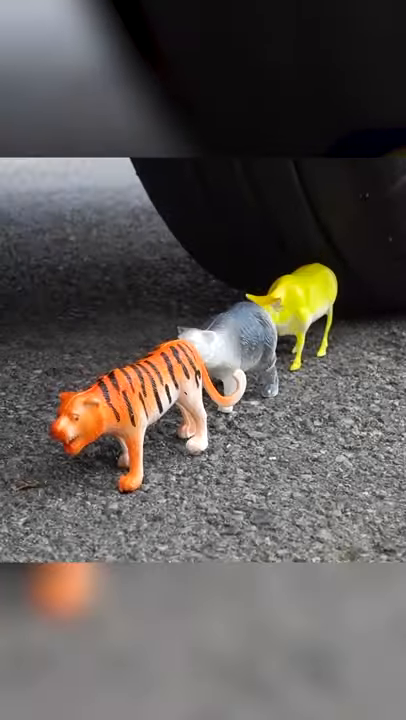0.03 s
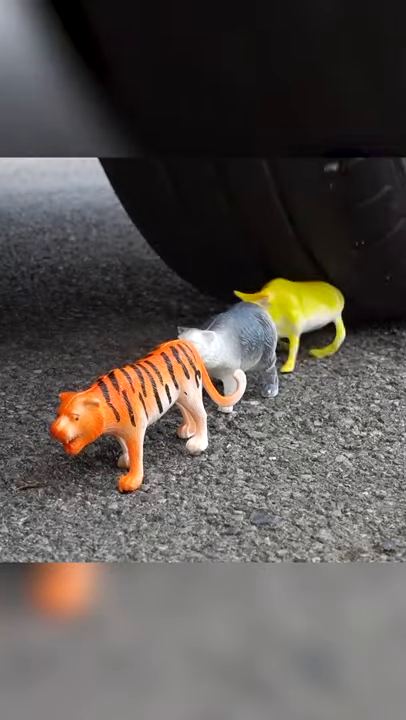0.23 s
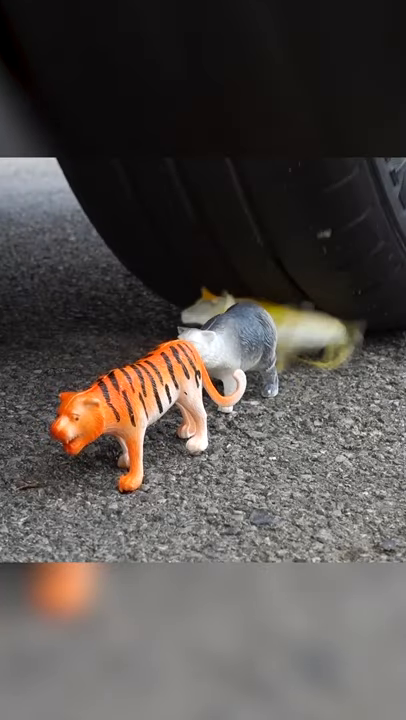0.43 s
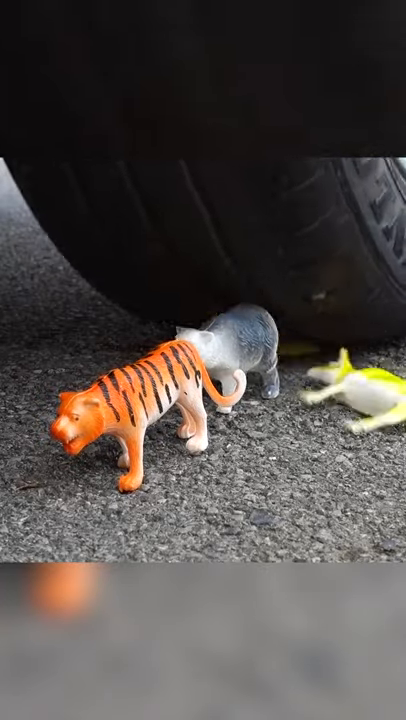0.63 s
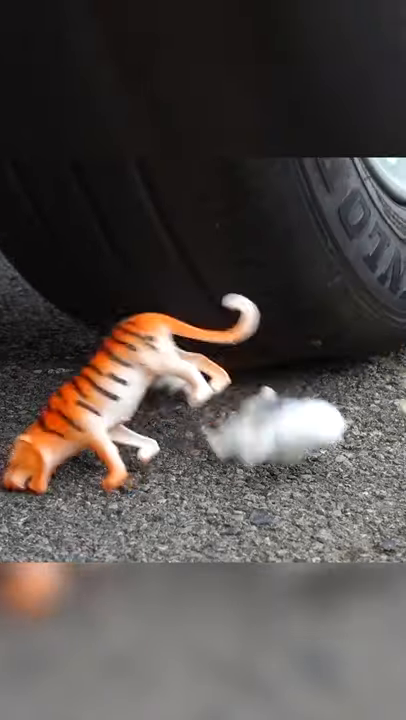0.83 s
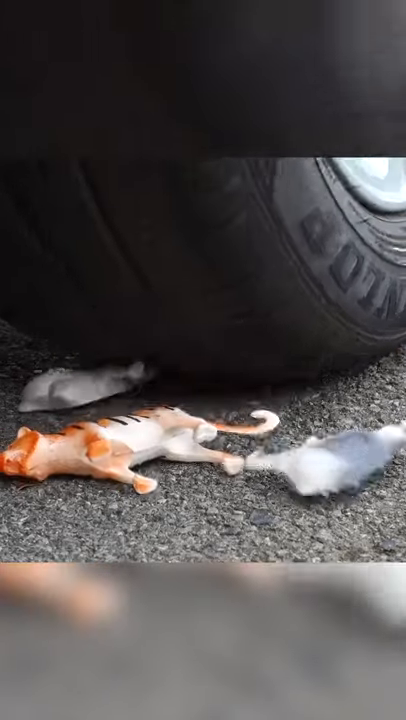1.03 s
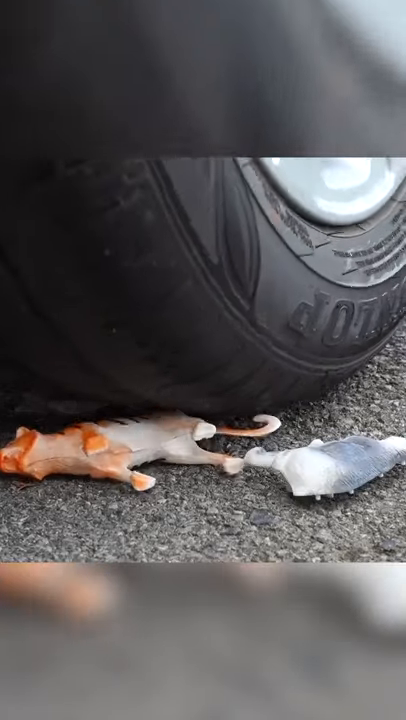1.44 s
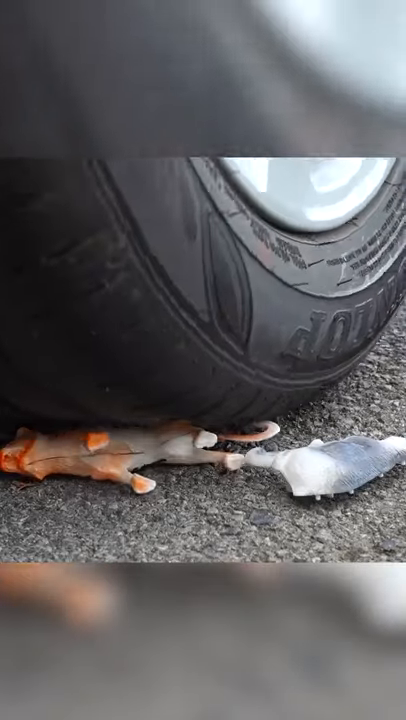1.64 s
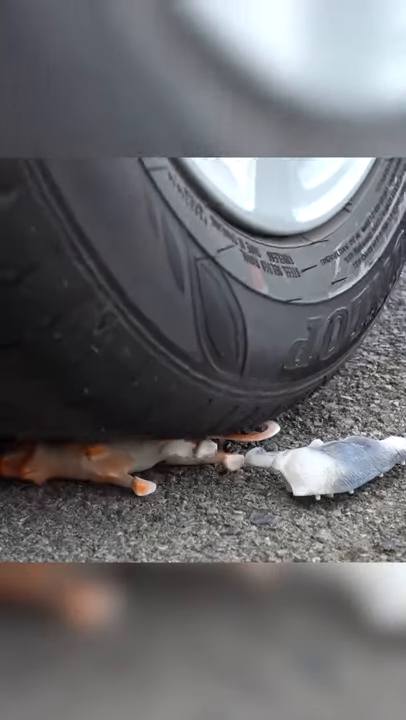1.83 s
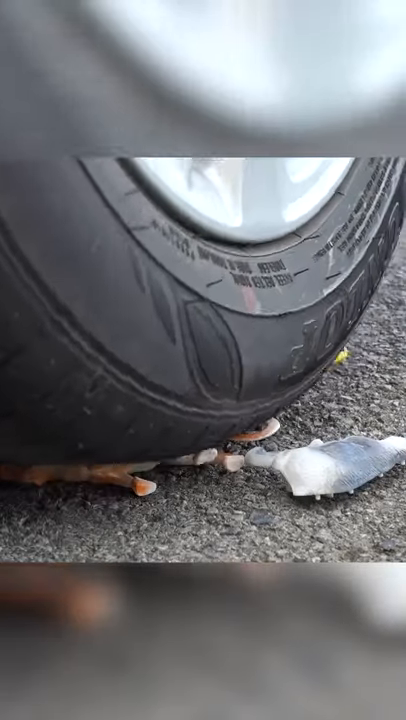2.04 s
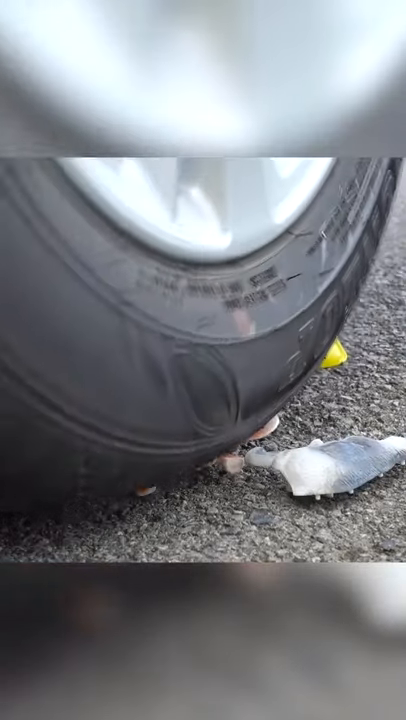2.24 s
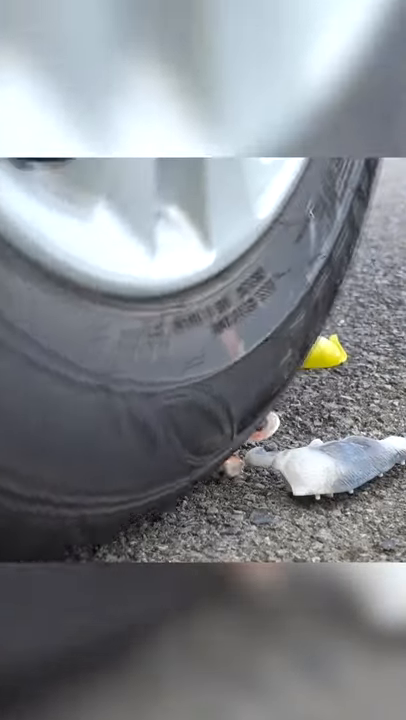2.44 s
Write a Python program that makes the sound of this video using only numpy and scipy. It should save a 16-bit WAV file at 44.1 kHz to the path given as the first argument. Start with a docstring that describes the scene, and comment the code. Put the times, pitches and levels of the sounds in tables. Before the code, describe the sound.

Hollow plastic toys crack under a slowly rolling car tyre, close up on asphalt. Sharp snaps start at about 0.2 seconds and thicken into a crunch around 0.5, with low thumps and crackling grit. The loudest burst comes near 0.8 seconds, then thins to small ticks. More sharp cracks land at 2.0 and around 2.2 seconds. Faint tread hiss and a quietly idling engine continue underneath.

```python
"""A car tyre rolls slowly over hollow plastic toy animals on asphalt, close to the microphone.
The shells give way almost straight ahead, in runs of sharp cracks, each with a brief ring and a low
thump; splinters and grit crackle between them. Behind them the tread hisses and the engine idles
quietly. Sound bounces back from under the car and, faintly, from the open yard.
At this distance the loudest cracks overload the recorder."""
import sys
import numpy as np
from scipy import signal
from scipy.fft import rfft, irfft
from scipy.io import wavfile

SR = 44100
rng = np.random.default_rng(int(sys.argv[2]) if len(sys.argv) > 2 else 0)


def unload_wav(signal):
    """Save mono or channel-first audio to the path in sys.argv[1] as 16-bit WAV at rate SR, clipped to [-1, 1]."""
    wavfile.write(
        sys.argv[1],
        SR,
        np.round(np.clip(np.atleast_2d(signal).T, -1, 1) * 32767).astype(np.int16),
    )


N = 110250
TIMES, FREQS = np.arange(N) / SR, np.arange(N // 2 + 1) * SR / N
SIDE = np.array([[1], [-1]])   # adds on the left, subtracts on the right

# Engine and outdoor noise, spectrum: f/Hz, relative level/dB
AIR_COLOUR = [(15, -6), (25, -5), (49, -6), (70, -22), (153, -5), (185, -9.5), (229, -7.5), (335, -25.5),
              (591, -9.5), (1040, -24), (1890, -25.5), (9840, -33.5), (16000, -54.5)]
# Stereo width of the background at the microphone: f/Hz, side over mid
BACKGROUND_WIDTH = [(40, 0.82), (100, 0.43), (160, 0.68), (300, 0.4), (600, 0.16), (2000, 0.2),
                    (12000, 0.24)]
# Hum of the idling engine: f/Hz, relative level/dB
IDLE_TONES = [(40.5, -44), (102.3, -56), (161.5, -49), (220.7, -54.5), (602.9, -52), (705.2, -64)]
# Hiss of the tread on asphalt: t/s, level/dB
HISS_LEVEL = [(0, -46), (.2, -46), (.7, -46.5), (1.1, -50), (1.3, -52), (1.7, -51.5), (2.0, -50.5),
              (2.5, -58.5)]
# Spectrum of that hiss: f/Hz, relative level/dB
HISS_SPECTRUM = [(700, 11.5), (1800, 0.5), (3500, -3.5), (8000, -4.5), (16000, -13.5)]
# Crackle of splinters and grit under the tread: t/s, level/dB
GRIT_LEVEL = [(0, -53.5), (.16, -54), (.23, -33), (.30, -45), (.35, -35.5), (.43, -33), (.49, -35.5),
              (.56, -34.5), (.61, -45), (.70, -56), (.77, -45.5), (0.833, -23), (.87, -34.5), (.91, -44.5),
              (.97, -36), (1.01, -43), (1.07, -40.5), (1.18, -53.5), (1.72, -58), (1.84, -47.5),
              (1.91, -62), (2.02, -45.5), (2.12, -56.5), (2.5, -62)]
# Strength of the grit's resonances: f/Hz, relative level/dB
GRIT_COLOUR = [(700, -0.5), (1200, 4.5), (2200, 5), (3200, 1), (6000, -5.5), (10000, -4), (15000, -22)]
# Walls ripping on after the biggest breaks: t/s, f/Hz, level/dB, decay/s
WALL_RIPS = [(.757, 5000, -26, .007), (.826, 8500, -20, .009), (.483, 950, -27, .007),
             (.838, 5600, -20.5, .01), (2.013, 3300, -19, .0105)]
# Shells cracking, levels before their trims: t/s, ring f/Hz, ring level/dB, snap f/Hz, snap level/dB,
# knock level/dB, thump level/dB and, where a second wall mode sounds, its f/Hz, level/dB
SHELL_CRACKS = [(0.2271, 1900, -11.5, 8900, -14.5, -34, -17), (0.2333, 1690, -23, 6130, -35, -28, -46),
                (0.2439, 2040, -19, 5870, -19.5, -26, -49, 1000, -23),
                (0.284, 2340, -31, 5070, -41, -34.5, -35), (0.3187, 2600, -32, 8000, -40, -49, -27),
                (0.3269, 2060, -33, 5110, -41, -40, -32), (0.342, 2130, -30, 5300, -50, -36, -50),
                (0.3624, 2380, -24, 5270, -18, -48, -15),
                (0.3646, 2300, -16.5, 9100, -15, -19.5, -16, 4300, -21),
                (0.369, 2520, -27, 8130, -21, -29, -19.5), (0.4, 1230, -28, 6090, -45, -33, -53),
                (0.4085, 1950, -20, 9700, -18.5, -26.5, -15, 1100, -20),
                (0.4225, 1850, -22, 5260, -35, -29, -28), (0.43, 1680, -14, 5920, -27, -29, -22, 3600, -25),
                (0.4367, 1800, -21.5, 6760, -37, -48, -23), (0.4408, 3500, -16, 7360, -13, -32, -14),
                (0.4427, 2100, -19, 10200, -16, -33, -14), (0.4457, 2200, -21, 8170, -20, -25, -23),
                (0.4582, 2130, -29, 9070, -25, -27, -18.5),
                (0.4614, 1980, -9, 6000, -11, -35, -14.5, 4100, -12),
                (0.469, 1550, -16, 8620, -26, -25, -36, 3500, -26),
                (0.4813, 2150, -10, 6850, -14, -16, -12, 3700, -11),
                (0.5117, 2130, -14.5, 7500, -8, -28, -12.5, 5900, -13),
                (0.5154, 3700, -13.5, 7800, -4, -22, -9.5, 1500, -22),
                (0.527, 3150, -22, 6500, -20, -42, -48), (0.5288, 2820, -29, 7610, -17.5, -46, -26),
                (0.5335, 3000, -25.5, 5240, -28, -28, -47),
                (0.5483, 2050, -21, 5610, -35, -51, -39, 3700, -27),
                (0.556, 2340, -52, 8850, -27.5, -38, -21), (0.6338, 3270, -42, 7450, -17.5, -58, -20.5),
                (0.638, 3450, -34, 7600, -23.5, -59, -20.5), (0.7164, 2420, -44, 8800, -37, -45, -28),
                (0.7542, 2230, -4, 6640, -7.5, -18.5, -9, 5250, -15),
                (0.7812, 2400, -9, 8000, -4, -10, -6.5, 5200, -14),
                (0.788, 2300, -19.5, 5000, -24, -39, -44),
                (0.8058, 2250, -14, 6730, -23, -19, -23, 1350, -15),
                (0.8133, 1330, -16.5, 6700, -27, -24, -17),
                (0.8178, 2400, -13.5, 6650, -10, -18, -14.5, 3700, -17),
                (0.8246, 2350, -11, 7000, -13.5, -19, -14, 6200, -14),
                (0.8287, 3000, -24, 8000, -23, -36, -34), (0.8315, 3600, -21, 7200, -14.5, -44, -17),
                (0.842, 3260, -25, 7500, -23, -36, -31),
                (0.8437, 2900, -21, 7000, -19, -30, -13.5, 5900, -18),
                (0.848, 2650, -20.5, 5190, -23, -33, -38), (0.8685, 3100, -35, 4980, -31, -52, -27),
                (0.8836, 3120, -33, 5850, -31, -56, -28), (0.921, 4500, -34, 6500, -26, -39, -37),
                (0.931, 2430, -28, 8000, -25, -51, -24.5), (0.959, 2720, -26.5, 6440, -28, -42, -23),
                (0.9675, 2240, -32, 4820, -32, -34, -30), (1.042, 4200, -27, 5760, -23, -33, -23),
                (1.1003, 3000, -29, 7000, -23, -33.5, -22), (1.1511, 4000, -43.5, 5640, -42, -44, -57),
                (1.5295, 2390, -43, 6440, -43.5, -47, -50), (1.5627, 2500, -25, 4270, -40, -50, -28.5),
                (1.773, 3300, -46, 5500, -45, -60, -50), (1.8026, 3600, -37, 5500, -38, -53, -27),
                (1.8062, 3300, -39, 7000, -39, -55, -40), (1.825, 3700, -38.5, 7900, -31.5, -64, -30.5),
                (1.847, 6000, -35, 7800, -30, -59, -42), (1.8557, 3180, -41, 6360, -29, -54, -30.5),
                (1.9977, 3500, -30.5, 4780, -50, -42, -33),
                (2.0097, 1130, -11, 10000, -9, -17, -8.5, 8550, -15),
                (2.0113, 3350, -14, 5200, -26, -30, -52, 2050, -16),
                (2.0398, 3000, -45, 11000, -28, -58, -50), (2.0893, 1810, -51, 10360, -28.5, -39, -24.5),
                (2.147, 4900, -22, 11000, -15, -10, -7, 11200, -15),
                (2.194, 11200, -13, 10800, -19, -12.5, -10, 4900, -19),
                (2.2617, 4300, -52, 7000, -46, -51, -48)]

RING_TRIM_DB, SNAP_TRIM_DB, KNOCK_TRIM_DB, THUMP_TRIM_DB = 1, -0.5, -3.5, -2.5
TEAR_S, TEAR_DECAY_S = 0.0014, 0.00053   # a tear runs this long, then dies with this time constant
RING_Q, MODE_Q, RIP_Q, SKIRT_Q = 3.2, 5.5, 1.3, 0.9
KNOCK_HZ, KNOCK_Q, KNOCK_GRIT = 650, 0.68, 0.2
THUMP_HZ, THUMP_WIDTH_HZ, THUMP_DELAY_S = 27.2, 16, 0.00094
CAVITY_HZ, CAVITY_WIDTH_HZ, CAVITY_DB = 243, 10.7, 1   # the air inside the tyre
TICKS_PER_S, TICK_SPREAD_DB, TICK_Q = 1100, 6, 6.7
AIR_DB, IDLE_TRIM_DB, IDLE_WAVER_HZ = -45.3, -1.5, 2.19


def from_db(db):
    """Decibels to gain."""
    return 10 ** (np.asarray(db) / 20)


def unit_rms(x):
    """Scale to an rms of 1."""
    return x / np.sqrt(np.mean(x ** 2) + 1e-20)


def at_hz(table, hz):
    """Read a table on a log-frequency axis."""
    freqs, values = np.transpose(table)
    return np.interp(np.log(hz + 1e-9), np.log(freqs), values)


def fader(table):
    """Gain over the whole scene from a table of times and levels."""
    return from_db(np.interp(TIMES, *np.transpose(table)))


def cut(x, hz, kind, order=2):
    """Butterworth low- or high-pass."""
    return signal.sosfilt(signal.butter(order, hz, kind, fs=SR, output="sos"), x)


def resonate(x, hz, width_hz):
    """A resonance with gain 1 at its peak."""
    r = np.exp(-np.pi * width_hz / SR)
    feedback = [1, -(1 + r * r) * np.cos(2 * np.pi * hz / SR), r * r]
    return signal.lfilter(np.array([1, 0, -1]) * (1 - r * r) / 2, feedback, x + 1e-18)


def add(track, start_s, sound):
    """Mix a sound in at a time."""
    i = int(start_s * SR)
    track[i:i + len(sound)] += sound[:N - i]


def noise_bed(colour):
    """Steady stereo noise with a given spectrum, rms 1."""
    mid, side = rfft(rng.standard_normal((2, N))) * from_db(at_hz(colour, FREQS))
    return unit_rms(irfft(mid + side * at_hz(BACKGROUND_WIDTH, FREQS) * SIDE, N))


def engine():
    """In the background the engine idles: wavering tones in steady engine and outdoor noise."""
    out = from_db(AIR_DB) * noise_bed(AIR_COLOUR)
    for hz, db in IDLE_TONES:
        waver = IDLE_WAVER_HZ * unit_rms(cut(rng.standard_normal(N), 11.5, "low"))
        phase = 2 * np.pi * np.cumsum(hz + waver) / SR
        spread = np.arctan(at_hz(BACKGROUND_WIDTH, hz)) * SIDE
        out += from_db(db + IDLE_TRIM_DB) * np.sqrt(2) * np.sin(phase + spread)
    return out


def tread_hiss():
    """The tread rolls over the asphalt with a smooth hiss."""
    return noise_bed(HISS_SPECTRUM) * fader(HISS_LEVEL)


def scatter(x, db, t60_s, cut_hz, width):
    """A dull, dying stereo wash that reaches the microphone 2 ms behind the direct sound."""
    t = np.arange(SR // 2) / SR
    decay = from_db(-60 * t / t60_s) * (t > 0.002)
    mid, side = cut(rng.standard_normal((2, len(t))), cut_hz, "low", order=1) * decay
    response = mid + width * side * SIDE
    response /= np.sqrt(np.sum(response ** 2) / 2)
    return from_db(db) * signal.fftconvolve(x[None], response, axes=1)[:, :N]


def reflections(toys, thump):
    """The breaking comes back from the yard and from under the car, where the thumps boom too."""
    yard = scatter(toys, db=-36.5, t60_s=0.34, cut_hz=1700, width=0.2)
    under_car = scatter(toys, db=-17, t60_s=0.052, cut_hz=5600, width=0.32)
    boom = scatter(cut(thump, 131, "high"), db=-24, t60_s=0.11, cut_hz=430, width=1.03)
    return yard + under_car + boom


def grit():
    """Splinters and grit tick at random; each tick jolts many short resonances in a mix of its own."""
    strength = from_db(TICK_SPREAD_DB * np.minimum(rng.exponential(1, N), 4))
    ticks = strength * (rng.random(N) < TICKS_PER_S / SR)
    crackle = np.zeros(N)
    for hz in np.geomspace(700, 15000, 16):
        ringing = resonate(ticks * rng.standard_normal(N), hz, hz / TICK_Q)
        crackle += from_db(at_hz(GRIT_COLOUR, hz)) * unit_rms(ringing)
    return unit_rms(crackle) * fader(GRIT_LEVEL)


def thumps():
    """Each crack brings a step of pressure that swings back slowly and sets the tyre's air humming."""
    jolts = np.zeros(N)
    for start_s, _, _, _, _, _, thump_db, *_ in SHELL_CRACKS:
        add(jolts, start_s + THUMP_DELAY_S, from_db([thump_db + THUMP_TRIM_DB]))
    r = np.exp(-np.pi * THUMP_WIDTH_HZ / SR)
    swing = signal.lfilter([1, -1], [1, -2 * r * np.cos(2 * np.pi * THUMP_HZ / SR), r * r], jolts)
    swing = cut(swing, 4.5, "high", order=1)
    swing = cut(swing, 600, "low", order=1)
    return swing + from_db(CAVITY_DB) * resonate(swing, CAVITY_HZ, CAVITY_WIDTH_HZ)


def wall(x, hz, q):
    """A plastic wall rings; a second, broad resonance steepens the fall on either side."""
    return resonate(resonate(x, hz, hz / q), hz, hz / SKIRT_Q)


def rips(attack_s=0.001):
    """A split runs on through the wall as a dense, dying rasp."""
    out, t = np.zeros(N), np.arange(SR // 10) / SR
    for start_s, hz, db, decay_s in WALL_RIPS:
        rasp = unit_rms(wall(rng.standard_normal(len(t)), hz, RIP_Q))
        envelope = np.minimum(t / attack_s, 1) * np.exp(-t / decay_s)
        add(out, start_s, from_db(db) * rasp * envelope)
    return out


def tear():
    """A burst of tiny fractures, its energy spread evenly over all pitches."""
    t = np.arange(SR // 40) / SR
    envelope = np.exp(-np.maximum(t - TEAR_S, 0) / TEAR_DECAY_S)
    spectrum = rfft(rng.standard_normal(len(t)) * envelope)
    flat_burst = irfft(spectrum / (np.abs(spectrum) + 1e-12), len(t))
    return flat_burst * np.sqrt(envelope)


def snap(hz):
    """The bright edge of a tear: one broad band of treble."""
    band = resonate(tear(), hz, width_hz=hz)
    return cut(cut(band, 2600, "high"), 1.84 * hz, "low")


def knock():
    """The shell gives way with one dull push, roughened by the tear."""
    rough = tear()
    push = KNOCK_GRIT * rough / np.sqrt(np.sum(rough ** 2))
    push[0] -= 1
    return cut(resonate(push, KNOCK_HZ, KNOCK_HZ / KNOCK_Q), 1650, "low")


def cracks():
    """Close up, each shell tears with a ring, a snap, a knock and at times a second wall mode."""
    out = np.zeros(N)
    for start_s, ring_hz, ring_db, snap_hz, snap_db, knock_db, _, *second_mode in SHELL_CRACKS:
        parts = [(wall(tear(), ring_hz, RING_Q), ring_db + RING_TRIM_DB),
                 (snap(snap_hz), snap_db + SNAP_TRIM_DB),
                 (knock(), knock_db + KNOCK_TRIM_DB)]
        if second_mode:
            mode_hz, mode_db = second_mode
            parts.append((wall(tear(), mode_hz, MODE_Q), mode_db))
        for part, db in parts:
            rms = np.sqrt(np.sum(part ** 2) / (0.004 * SR))   # its energy spread over 4 ms
            add(out, start_s, from_db(db) * part / rms)
    return out


def microphones(toys, lag_s=3.5e-6):
    """The toys sit almost straight ahead: the left microphone hears them a touch later and softer."""
    left = irfft(rfft(toys) * np.exp(-2j * np.pi * FREQS * lag_s), N)
    return np.array([left, toys]) * from_db(-0.12 * SIDE)


def scene():
    """From beside the tyre: engine, tread and reflections behind, the breaking toys in front."""
    toys = cracks() + rips() + grit()
    thump = thumps()
    return engine() + tread_hiss() + reflections(toys, thump) + thump + microphones(toys)


def record(dry):
    """The recorder clips the loudest peaks and passes next to nothing above 16.9 kHz."""
    clipped = np.clip(dry, -0.81, 0.81)
    return signal.sosfilt(signal.cheby2(16, 70, 16900, fs=SR, output="sos"), clipped)


dry = scene()
out = record(dry)
unload_wav(out)
```